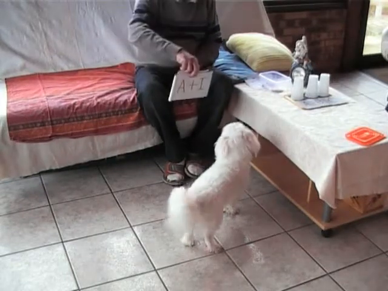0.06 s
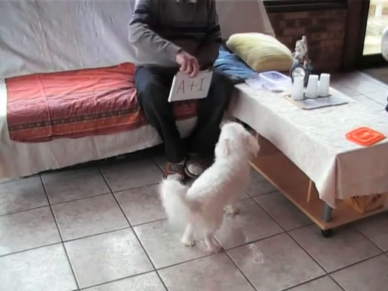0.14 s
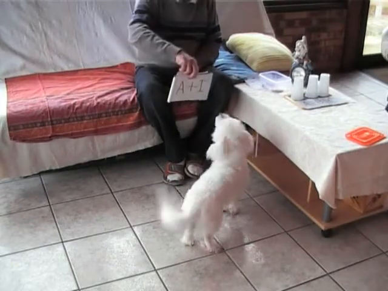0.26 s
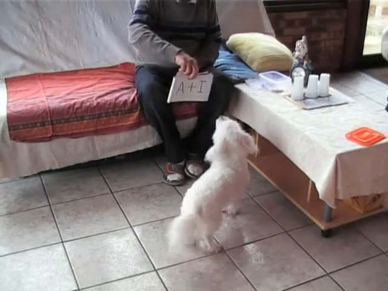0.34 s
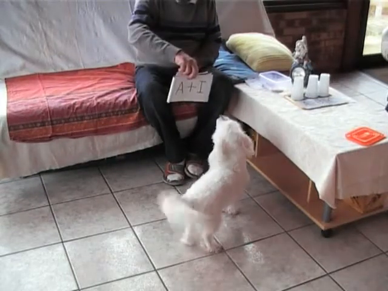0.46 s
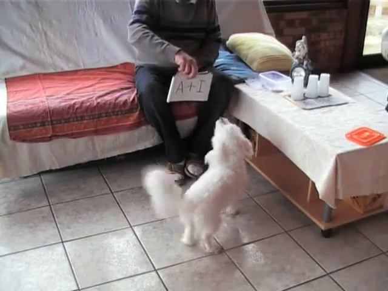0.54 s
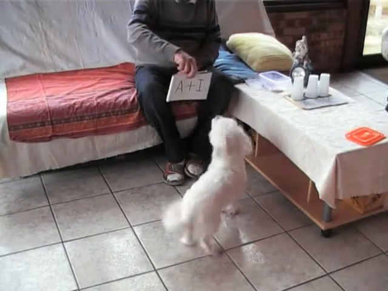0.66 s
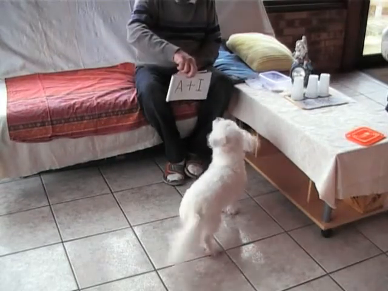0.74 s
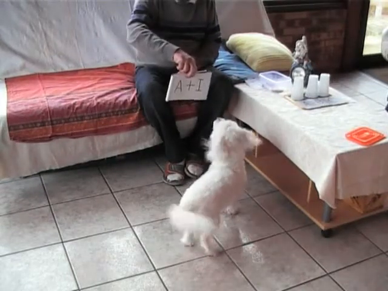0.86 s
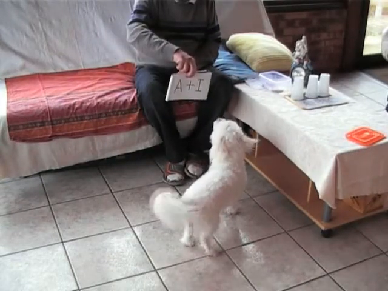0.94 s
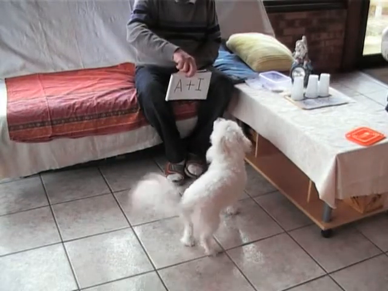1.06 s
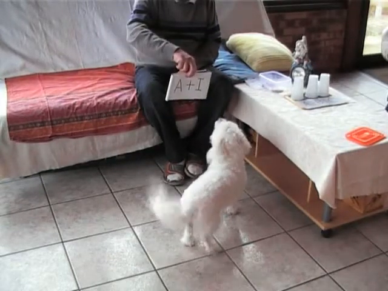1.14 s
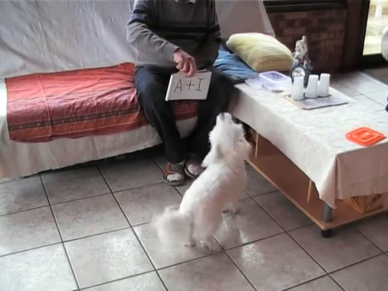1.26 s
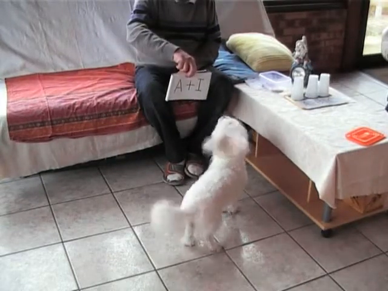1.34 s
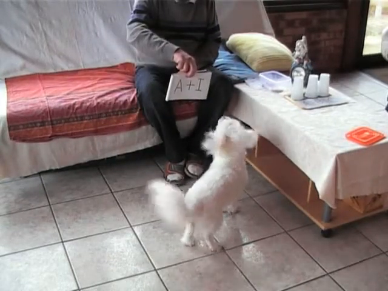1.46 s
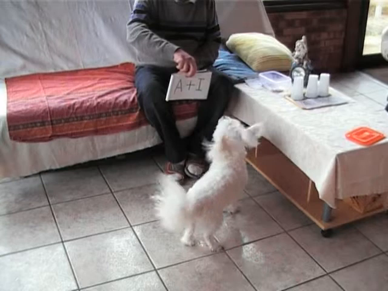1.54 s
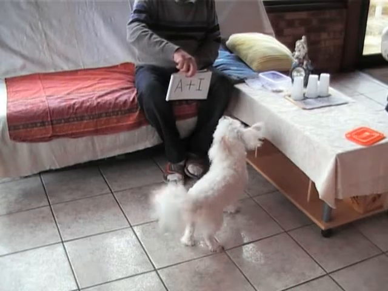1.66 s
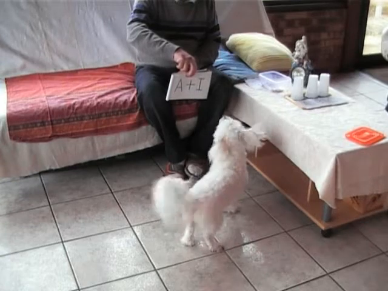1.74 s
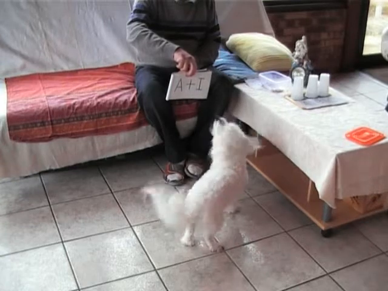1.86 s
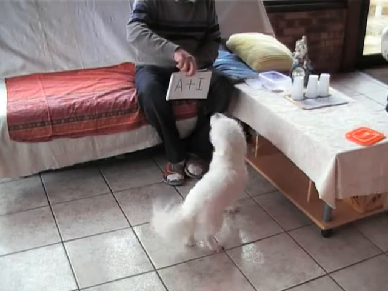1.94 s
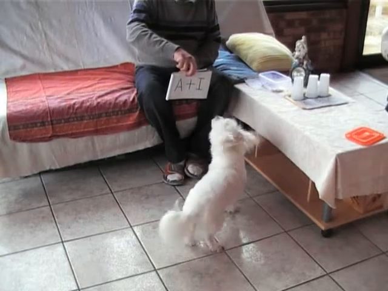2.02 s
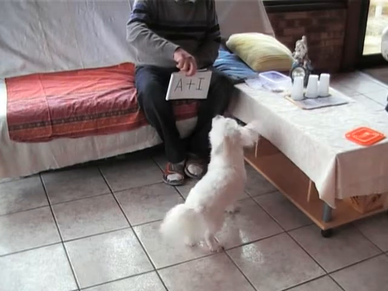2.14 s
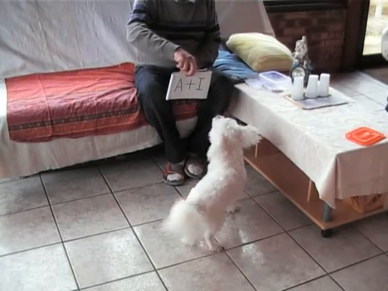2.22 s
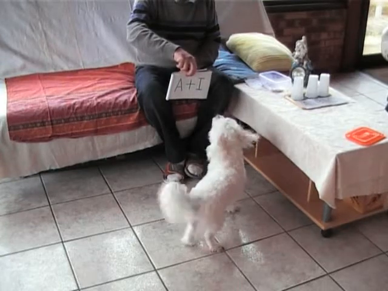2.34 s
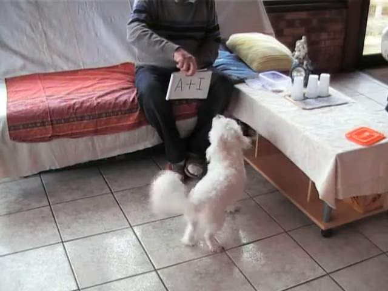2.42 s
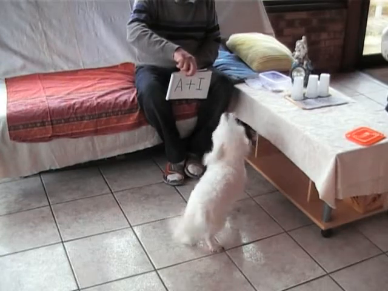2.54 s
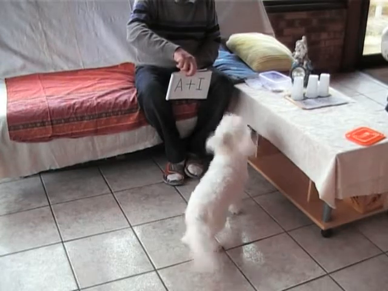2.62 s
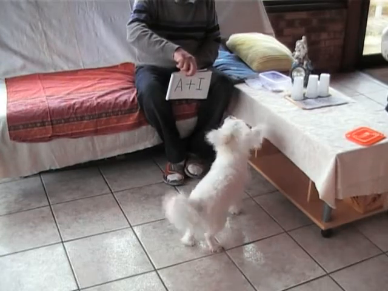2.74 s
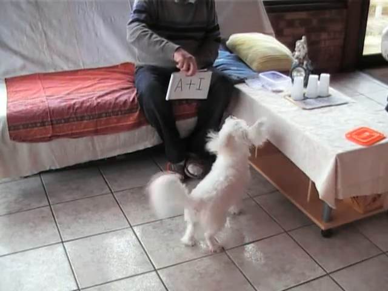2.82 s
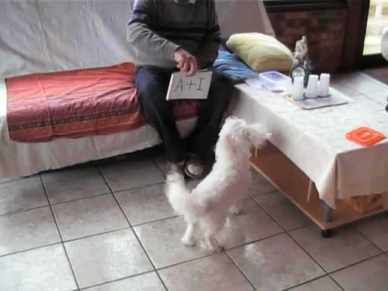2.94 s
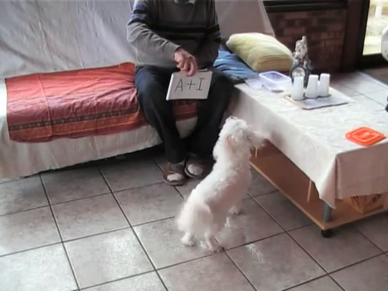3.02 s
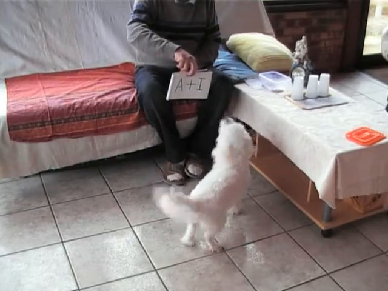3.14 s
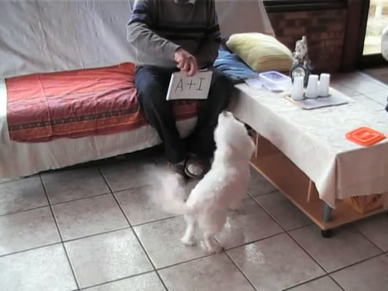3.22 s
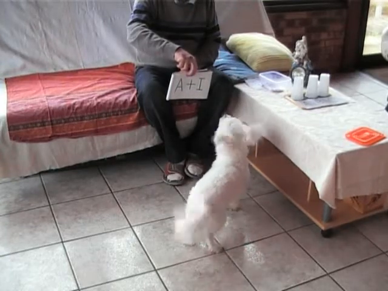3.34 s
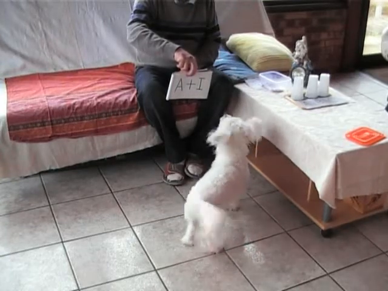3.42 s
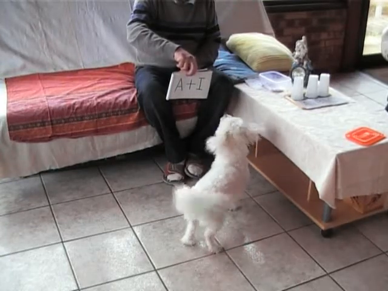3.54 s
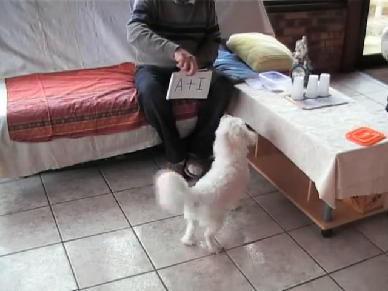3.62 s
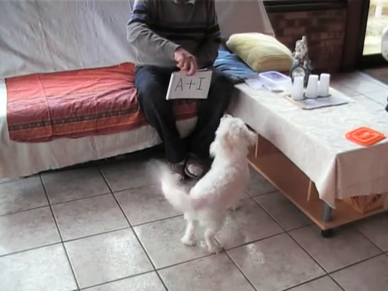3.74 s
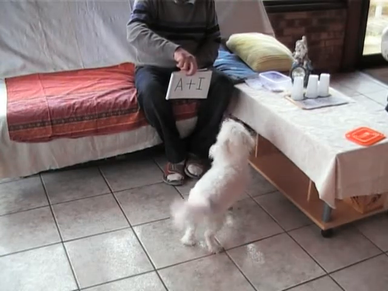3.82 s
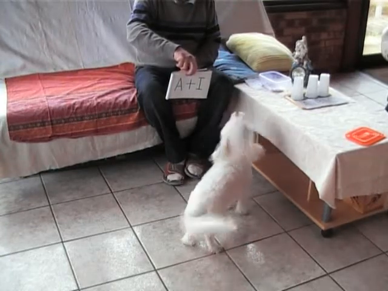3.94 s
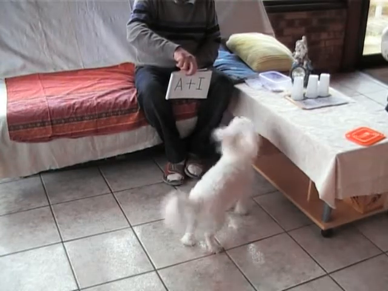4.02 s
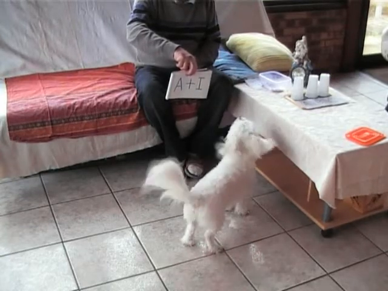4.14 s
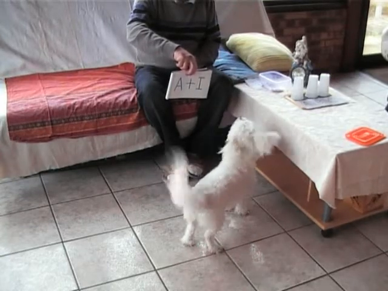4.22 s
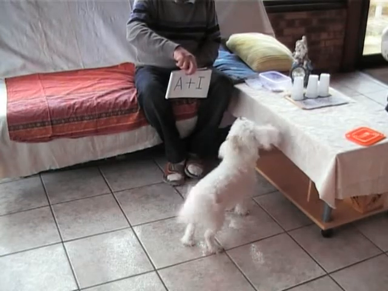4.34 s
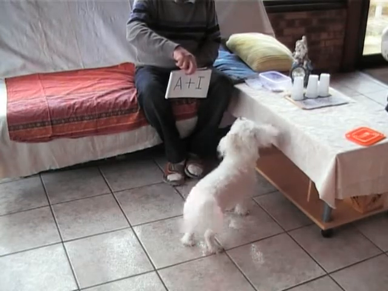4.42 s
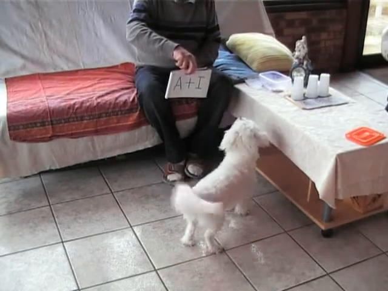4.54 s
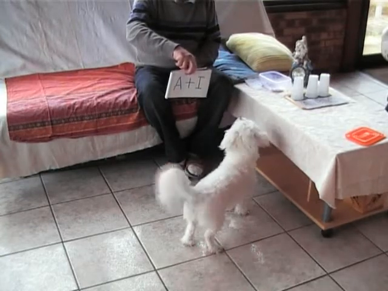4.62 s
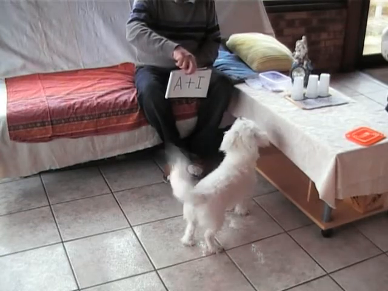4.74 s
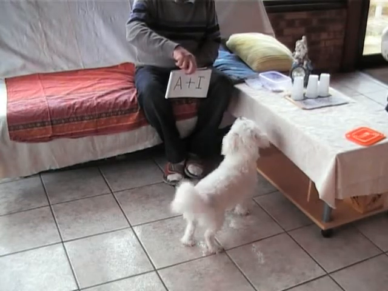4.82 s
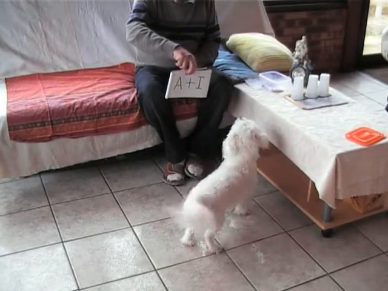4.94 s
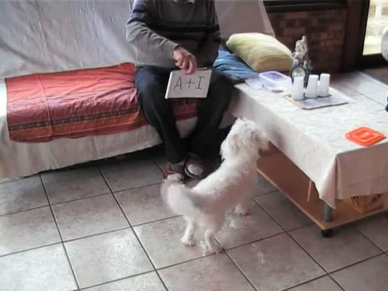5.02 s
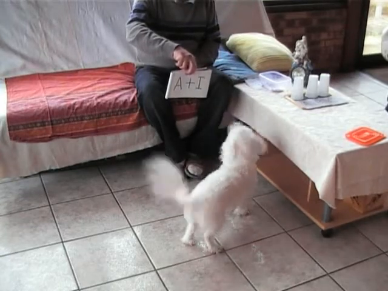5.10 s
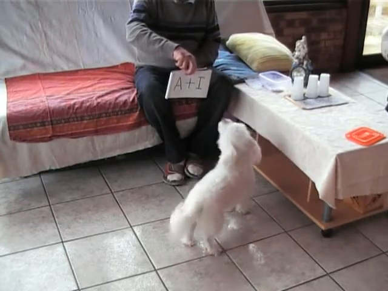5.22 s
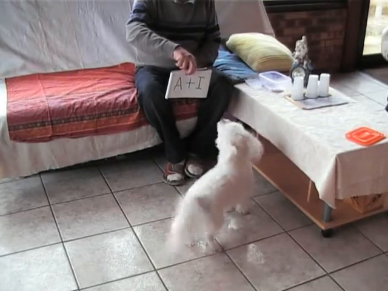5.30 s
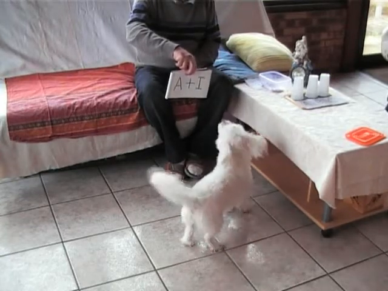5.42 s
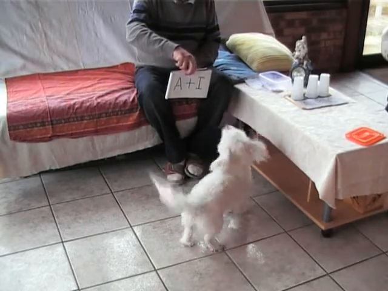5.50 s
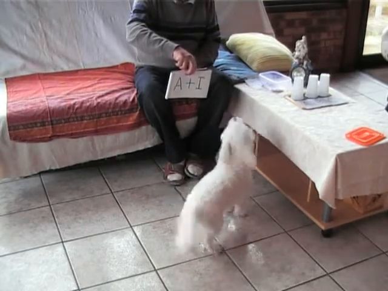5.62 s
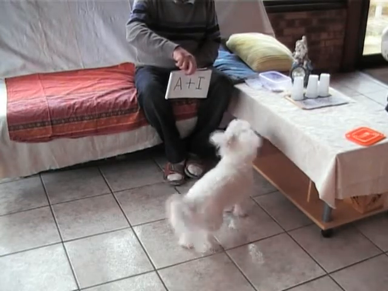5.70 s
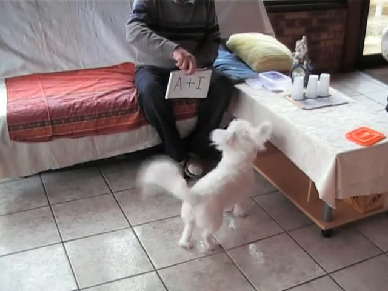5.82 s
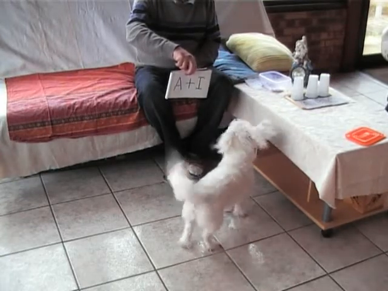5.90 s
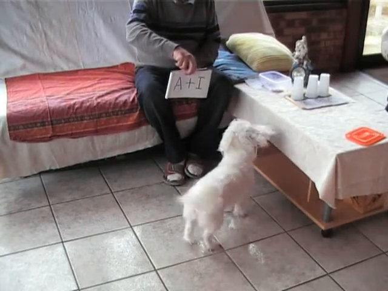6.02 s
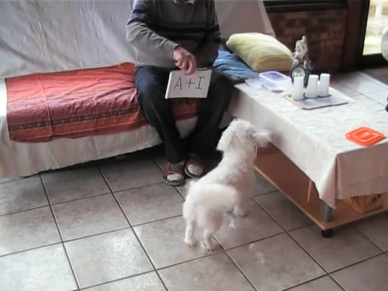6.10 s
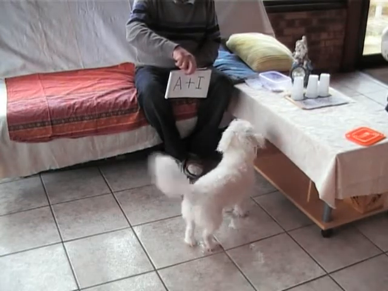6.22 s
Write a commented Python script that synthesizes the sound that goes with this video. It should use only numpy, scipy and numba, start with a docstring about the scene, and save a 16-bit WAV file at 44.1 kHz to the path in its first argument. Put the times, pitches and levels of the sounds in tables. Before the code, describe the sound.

Over faint room air and microphone hiss, a little dog barks singly and insistently. The yaps start with a tiny creak, open into a hoarse, high tone and splash off tiles and walls. Closed-mouth grunts lead into the sixth and seventh barks; after a longer pause a grunt brings a soft, nearly shut-mouth woof, then tiny clicks and a last rough bark. The camcorder sound is slightly overloaded, the dog turned away.

```python
"""In the hiss of a still, tiled room a small dog, facing away from a camcorder, barks nine times.
Each bark starts as a creak, then a clear tone and rough pulses ring the throat and the opening mouth.
Dense, bright reflections follow; gain control comes late, so attacks can clip before the level is ducked.
Short grunts lead up to the sixth, seventh and eighth barks, the eighth a muffled woof.
Tiny clicks, made of short noise bursts, come before the sixth and ninth barks and at the very end."""
import sys
import numpy as np
from scipy import signal
from scipy.fft import rfft, irfft
from scipy.io import wavfile
from numba import njit

SR = 44100
rng = np.random.default_rng(int(sys.argv[2]) if len(sys.argv) > 2 else 0)


def file_out(sig):
    """Save sig as 16-bit WAV at sys.argv[1]."""
    # one column per channel
    cols = np.atleast_2d(sig).T
    # limit, then scale
    lim = np.clip(cols, -1, 1)
    pcm = np.round(lim * 32767).astype(np.int16)
    wavfile.write(sys.argv[1], SR, pcm)


N = 276066


def undb(db):
    """Decibels to gain."""
    return 10 ** (np.asarray(db) / 20)


def on_log(hz, points, values):
    """Values joined by straight lines on a log-frequency axis."""
    return np.interp(np.log(np.maximum(hz, 1)), np.log(points), values)


def colour(x, table):
    """Filter a sound along a curve of (f/Hz, level/dB) points."""
    hz = np.fft.rfftfreq(x.shape[-1], 1 / SR)
    gain = undb(on_log(hz, *np.transpose(table)))
    return irfft(rfft(x) * gain, x.shape[-1])


def ring(x, hz, width_hz):
    """One resonance, gain 1 at its centre."""
    return signal.lfilter(*signal.iirpeak(hz, hz / width_hz, fs=SR), x)


@njit
def sweep(x, hz, width_hz):
    """A resonance whose centre and width move, gain 1 at its centre."""
    y, band, low = np.empty(len(x)), 0., 0.
    for i in range(len(x)):
        g, k = np.tan(np.pi * hz[i] / SR), width_hz[i] / hz[i]
        v = (band + g * (x[i] - low)) / (1 + g * (g + k))
        band, low, y[i] = 2 * v - band, low + 2 * g * v, k * v
    return y


def cut(x, hz, kind, order=2):
    """Low-pass or high-pass."""
    return signal.sosfilt(signal.butter(order, hz, kind, fs=SR, output="sos"), x)


def add(track, s, sound):
    """Lay a sound into a track at time s."""
    i = int(s * SR)
    track[i:i + len(sound)] += sound[:len(track) - i]


def wobble(rate, size):
    """Random values drawn rate times a second, joined by straight lines."""
    return np.interp(np.arange(size) / SR * rate, np.arange(size), rng.standard_normal(size))


def by_jaw(pair, jaw):
    """A value between its shut-jaw and wide-jaw ends."""
    return np.interp(jaw, [0, 1], pair)


def port_noise(size):
    """Diffuse noise at two close microphone ports: alike in the bass, less so in the treble."""
    # side relative to mid: (f/Hz, level/dB)
    side_curve = [(100, -35.5), (600, -22.5), (1200, -17), (2500, -13), (4500, -9.5), (8000, -4.5),
                  (13000, 1)]
    mid, side = rng.standard_normal((2, size))
    side = colour(side, side_curve)
    return np.array([mid + side, mid - side])


def quiet(rms_db=-58.5):
    """Still room air and the camcorder's faint hiss: coloured noise whose level wanders."""
    # spectrum of room air and microphone hiss, relative levels: (f/Hz, level/dB)
    air_curve = [(40, -19.5), (65, -17.5), (110, -10.5), (170, -13.5), (250, 2.5), (340, -5.5), (600, -7),
                 (850, -5), (1200, -12), (3000, -16.5), (4200, -20), (6000, -20.5), (8500, -26),
                 (11500, -28.5)]
    air = colour(port_noise(N), air_curve) * undb(4.0 * wobble(2.1, N))
    return air * undb(rms_db) / np.std(air)


def room(x, gap_s=0.0014, build_s=0.0039, echo_db=2, peak_width_hz=22, size=44100):
    """Dense reflections off tiles and walls; each band dies at its own rate."""
    # echo bands, relative levels: (f/Hz, level/dB, t60/s)
    echo_bands = [(99, -2, 0.89), (304, 1, 0.6), (390, 1, 0.94), (635, 7.5, 0.68), (881, -1, 0.67),
                  (1296, 1, 0.65), (2127, 1.5, 0.63), (2650, -9.5, 0.64), (3350, -5.5, 0.63),
                  (6400, -5, 0.48), (12200, -8.5, 0.28)]
    # narrow peaks and dips that colour the echo noise: (f/Hz, level/dB)
    echo_colour = [(611, -1), (706, 1.5), (750, 6), (922, 6), (999, 4), (1069, 0), (1328, -11), (1482, 1),
                   (1691, 7.5), (1874, -2.5), (2026, 2.5), (2170, 3.5), (2740, 7)]
    t, hz = np.arange(size) / SR, np.fft.rfftfreq(size, 1 / SR)
    points, dbs, t60s = np.transpose(echo_bands)

    colour_db = 0
    for centre, db in echo_colour:
        colour_db = colour_db + db / (1 + (2 * (hz - centre) / peak_width_hz) ** 2)
    noise = rfft(port_noise(size)) * undb(colour_db)

    tail = np.zeros((2, size))
    # each row of the identity picks one band, overlapping its neighbours
    for band, db, t60 in zip(np.eye(len(echo_bands)), dbs, t60s):
        band_noise = irfft(noise * on_log(hz, points, band), size)
        tail += band_noise * undb(db - 60 * t / t60)
    build_up = np.clip((t - gap_s) / build_s, 0, 1)
    tail *= build_up * undb(echo_db) / np.sqrt(SR / 20)
    return signal.fftconvolve(x[None], tail, axes=1)[:, :N]


def throat(flow, hz, opening, chest_db, shut_width_hz=120, open_width_hz=260):
    """The lowest airway resonance, damped more as the mouth opens, over a weak chest tone."""
    width = shut_width_hz + (open_width_hz - shut_width_hz) * opening
    main = sweep(sweep(flow, hz, width), hz, 2 * width)
    open_tone = 0.058 * opening * ring(flow, 704, 230)
    chest = undb(chest_db) * ring(flow, 340, 170)
    return main + open_tone + chest


def hiss(flow):
    """Air rushing past the teeth excites high, broad resonances."""
    # teeth resonances, relative levels: (f/Hz, width/Hz, level/dB)
    teeth = [(4000, 500, -19.5), (5880, 4400, -24), (9270, 1500, -28.5)]
    bands = sum(undb(db) * ring(flow, hz, width) for hz, width, db in teeth)
    return cut(bands, 2900, "high")


def grunt(db, size):
    """One closed-mouth grunt: the vocal folds flap once and let a little air through."""
    t = np.arange(size) / SR
    air = 0.08 * rng.standard_normal(size) * np.exp(-t / 0.0071)
    flap = signal.unit_impulse(size) + air
    # a harder grunt lifts the throat resonance, by 6.5 Hz per dB
    throat_hz = np.full(size, 691 + 6.5 * db)
    body = throat(flap, throat_hz, np.zeros(size), chest_db=-24.5)
    mouth = 0.14 * ring(ring(flap, 1600, 500), 1600, 500)
    return undb(db) * (body + mouth + 0.45 * hiss(air))


def tick(db, size):
    """One click of lips or claws: a brief noise burst through high resonances."""
    burst = rng.standard_normal(size) * np.exp(-np.arange(size) / SR / .0015)
    return undb(db) * ring(hiss(burst), 9500, 5000)


def small_sounds(size=4000):
    """Grunts that lead up to some barks, and clicks of lips and claws."""
    # closed-mouth grunts, relative levels: (t/s, level/dB)
    grunts = [(3.193, 16), (3.224, 14.5), (3.257, 26), (3.270, 22.5), (3.970, 23.5), (3.980, 26),
              (5.164, 6), (5.198, 4.5), (5.223, 23)]
    # lip and claw clicks, relative levels: (t/s, level/dB)
    ticks = [(3.204, 4.5), (5.647, 15), (5.659, 17), (6.190, -7), (6.215, -6)]
    out = np.zeros(N)
    for s, db in grunts:
        add(out, s, grunt(db, size))
    for s, db in ticks:
        add(out, s, tick(db, size))
    return out


def open_mouth(flow, mouth_hz):
    """Mouth resonances of alternating sign, held between 350 and 3117 Hz."""
    # open-mouth resonances, relative levels: (multiple of the mouth resonance, width/Hz, level/dB)
    formants = [(.74, 325, -5.5), (1.0, 348, 2), (1.2, 398, 0), (1.45, 326, 0)]
    mouth = 0
    for k, (ratio, width, db) in enumerate(formants):
        mouth = mouth + (-1) ** k * undb(db) * ring(flow, ratio * mouth_hz, width)
    return cut(cut(mouth, 3117, "low", order=8), 350, "high", order=4)


def bark(lead, length, throat_db, throat_hz, tone_db, mouth_hz, jaw,
         creak_hz=140, creak_db=-12, jitter=.09, sag=.5, opening_s=0.027, clear_s=0.031, size=12000):
    """One bark: a slow creak, then a fading clear tone over ever less even pulses and turbulent air."""
    # the jaw sets the colour, from a muffled woof to a bright yap: (shut, wide)
    # relative levels: (shut/dB, wide/dB)
    mouth_level, teeth_level = (6, 16.5), (4.5, 15.5)
    chest_level, nose_level = (-5.5, -21.5), (-10.5, -14.5)
    # nose resonance: (shut/Hz, wide/Hz)
    nose_centre = (5850, 7350)
    # base share of rough air, before voicing raises it: (shut, wide)
    rasp = (0.95, 0.57)

    t = np.arange(size) / SR - lead
    progress = np.clip(t / length, 0, 1)
    voiced = np.clip(t / .003, 0, 1)
    opening = np.clip(t / opening_s, 0, 1)
    creak_effort = undb(creak_db) * (t < length / 2)
    effort = np.maximum(creak_effort, voiced * (1 - progress ** 2.9))

    # the dropping jaw scoops the throat resonance upward
    centre = throat_hz * np.interp(t, [-.015, .012, .09], [.9, .99, 1.08])
    # the second harmonic starts on that resonance and sags as the pressure gives out
    pitch = centre / 2 * (1 - sag * progress ** 2)
    unevenness = np.exp(jitter * (.25 + progress) * wobble(400, size))
    rate = np.where(t < 0, creak_hz, pitch) * unevenness
    phase = np.cumsum(rate) / SR
    pulses = np.diff(np.floor(phase), prepend=-1) * np.sqrt(SR / rate)
    pulses = pulses * undb(1.53 * wobble(212.1, size))
    tone = 0.2 * np.sin(4 * np.pi * phase) * voiced * np.exp(-(t / clear_s) ** 2)

    # turbulence puffs out once a cycle
    air = rng.standard_normal(size) * 2.304 * np.exp(-(phase % 1) / 0.72)
    rough = np.clip(by_jaw(rasp, jaw) * (1.058 + 0.42 * voiced), 0, 1)
    flow = effort * (np.sqrt(1 - rough ** 2) * pulses + rough * air)

    outlet = 0.17 + 0.59 * opening
    mouth = open_mouth(flow * outlet, mouth_hz)
    # part of the air rushes through the nose, part past the teeth
    jet = air * effort * np.sqrt(outlet)
    nose_hz = by_jaw(nose_centre, jaw)
    nose = ring(ring(jet, nose_hz, 1400), nose_hz, 1300)
    treble = undb(by_jaw(nose_level, jaw)) * nose + undb(by_jaw(teeth_level, jaw)) * hiss(jet)

    # subtracting throat_db frees the chest tone from the throat level
    chest_db = by_jaw(chest_level, jaw) - throat_db
    body = 0.89 * throat(flow * (1 - 0.22 * progress), centre, opening, chest_db)
    voice = undb(throat_db) * (body + undb(tone_db) * tone)
    return voice + undb(by_jaw(mouth_level, jaw)) * mouth + treble


def dog():
    """The run of barks, each voiced from its time of onset with the creak ahead of it."""
    # one row a bark, relative levels: (t/s, creaky lead-in/s, length/s, throat level/dB,
    # base throat f/Hz, clear tone level against throat/dB, mouth f/Hz, jaw 0 shut - 1 wide)
    barks = [ (0.298, 0.0095, 0.15, 13.5, 871.3, 4, 1876, 0.87),
             (.692, .013, .14, 13, 889.5, -5, 1780, 0.87), (1.358, .018, 0.11, 18.5, 963, -7.5, 1726, 0.96),
             (2.001, 0.0081, .13, 17.5, 931, 1.5, 1735, 0.85),
             (2.636, 0.019, .12, 17, 934, 2.5, 1653, 0.91),
             (3.301, .024, .10, 18.5, 953.8, -1.5, 1610, 0.93),
             (4.000, .012, .135, 16.5, 932.4, -6, 1732, 0.83),
             (5.269, 0.027, 0.079, 13, 818.7, -6.5, 1650, 0.07),
             (5.692, 0.018, 0.14, 15, 914.7, -28, 1710, 0.75)]
    out = np.zeros(N)
    for s, lead, *shape in barks:
        add(out, s - lead, bark(lead, *shape))
    return out


def scene(shadow_hz=1300, direct_db=3, small_echo_db=-6):
    """The dog's head shades the direct treble; barks thrown away from us stir the room more than small sounds."""
    barks, small = dog(), small_sounds()
    direct = undb(direct_db) * cut(barks + small, shadow_hz, "low", order=1)
    echo = room(barks + undb(small_echo_db) * small)
    return direct + echo + quiet()


@njit
def follow(x, attack, release):
    """Follow a level, at one speed up and another down."""
    y, e = np.empty(len(x)), 0.
    for i in range(len(x)):
        e += (x[i] - e) * (attack if x[i] > e else release)
        y[i] = e
    return y


def record(dry, threshold_db=-12, ratio=3.14, hold_s=0.0074, attack_s=0.015, release_s=0.0048,
           bias=0.09, top_hz=12600):
    """Gain control rides the peaks a little late; what gets past it clips, slightly lopsided."""
    peak = follow(np.max(np.abs(dry), axis=0), 0.065, 1 / (hold_s * SR))
    over_db = np.maximum(20 * np.log10(peak + 1e-9) - threshold_db, 0)
    duck_db = follow(over_db * (1 - 1 / ratio), 1 / (attack_s * SR), 1 / (release_s * SR))
    clipped = np.clip(dry * undb(-duck_db), -1, 1 - bias)
    centred = cut(clipped, 15, "high", order=1)
    # steep treble limit of the camcorder
    return signal.sosfilt(signal.ellip(6, .3, 55, top_hz, fs=SR, output="sos"), centred)


dry = scene()
out = record(dry)
file_out(out)
```